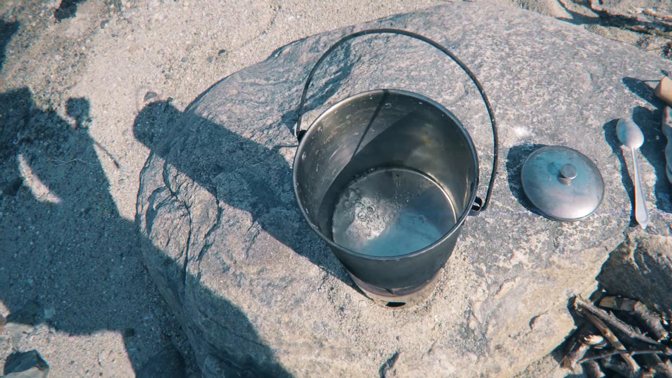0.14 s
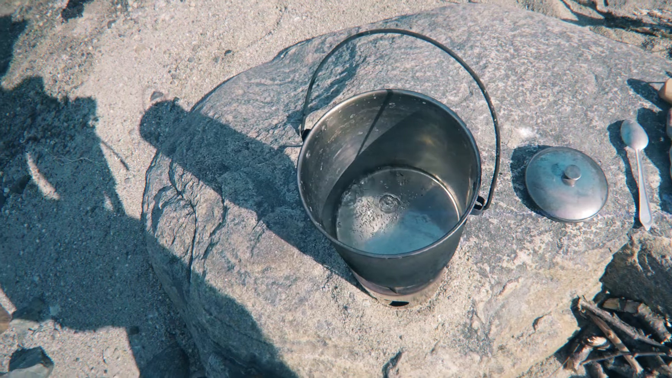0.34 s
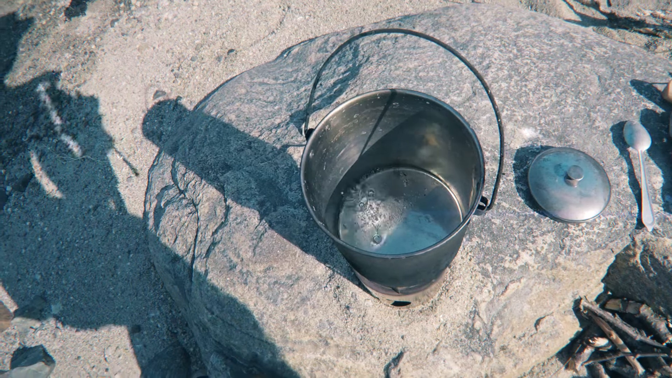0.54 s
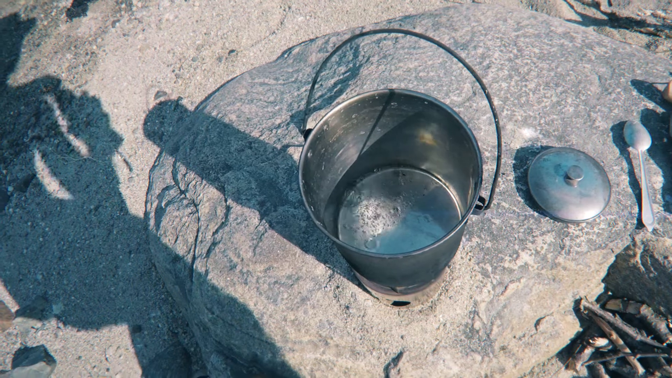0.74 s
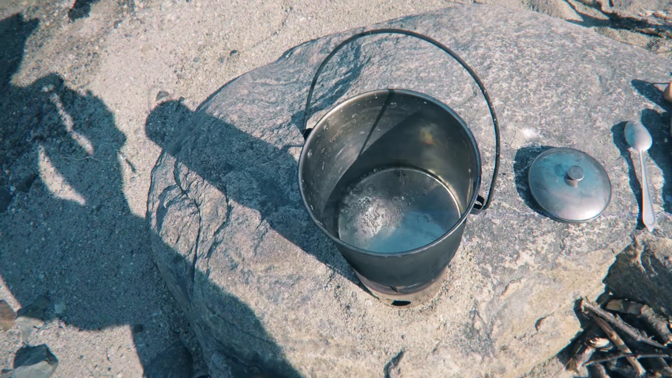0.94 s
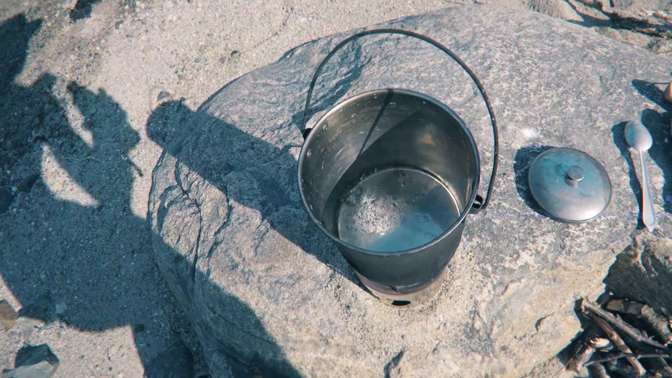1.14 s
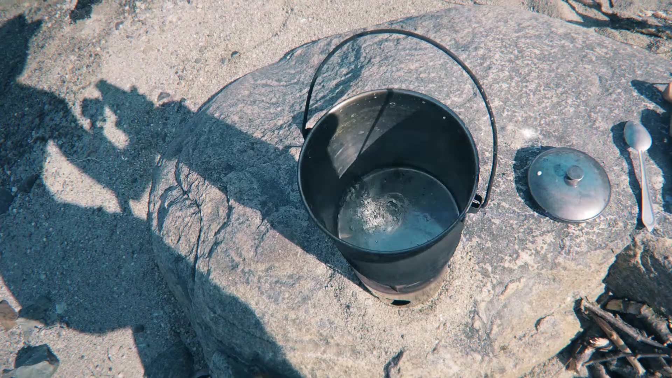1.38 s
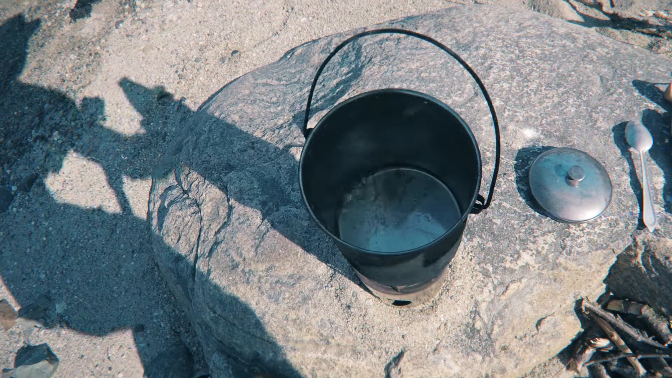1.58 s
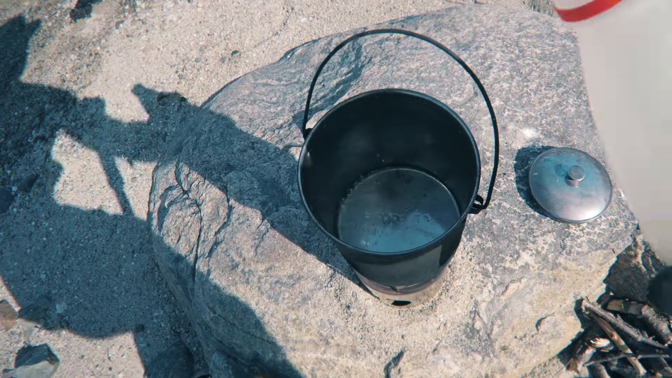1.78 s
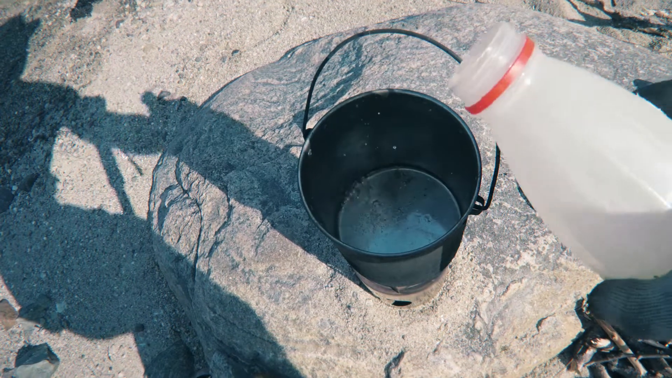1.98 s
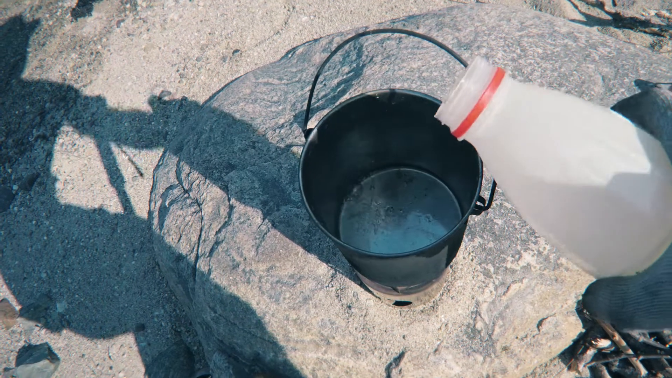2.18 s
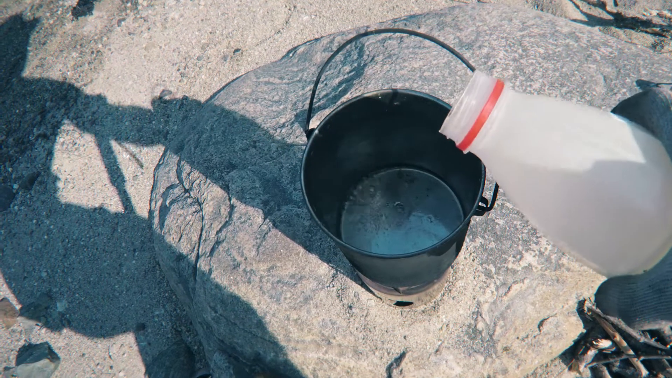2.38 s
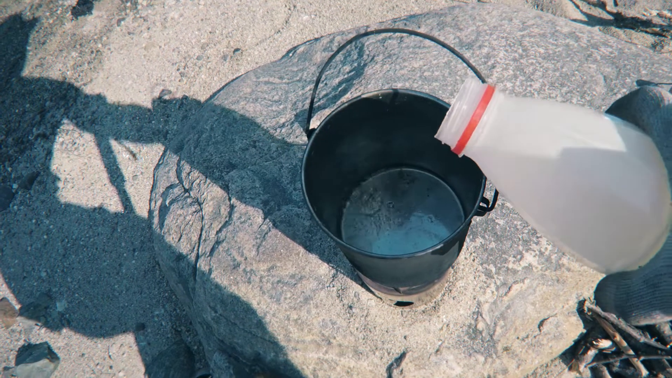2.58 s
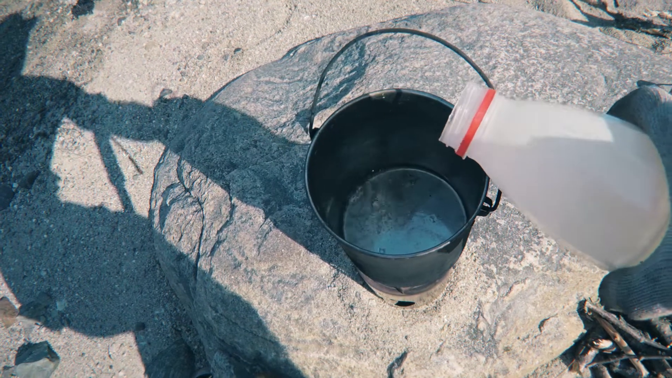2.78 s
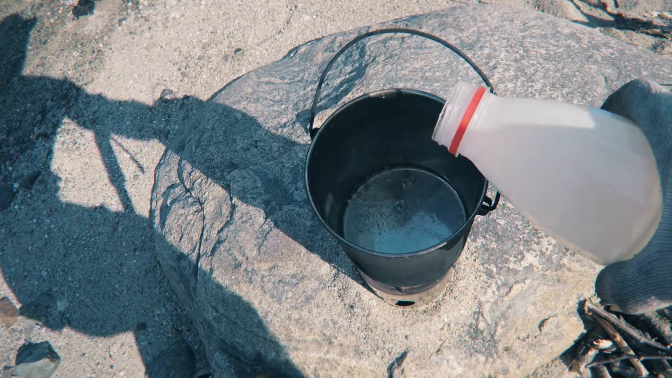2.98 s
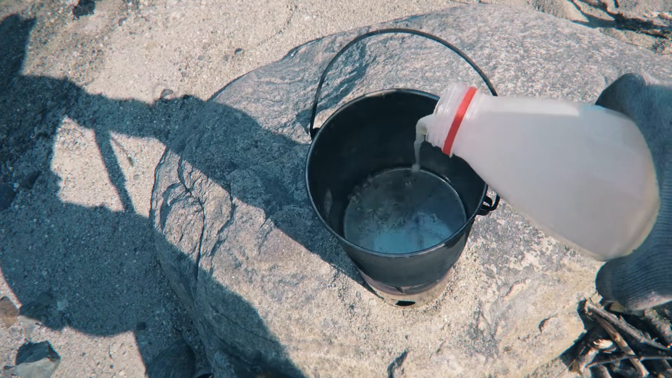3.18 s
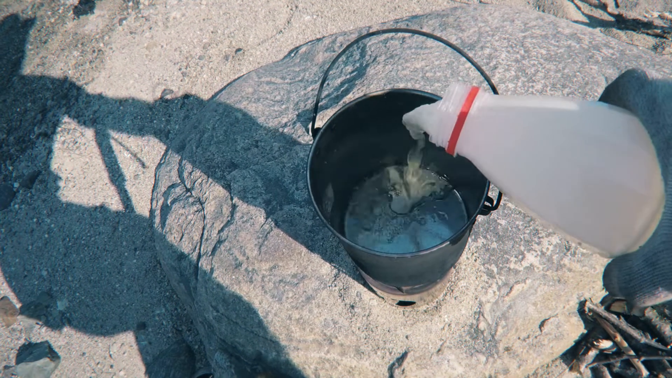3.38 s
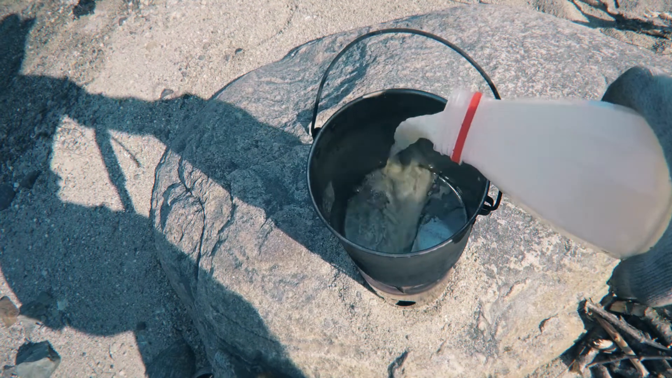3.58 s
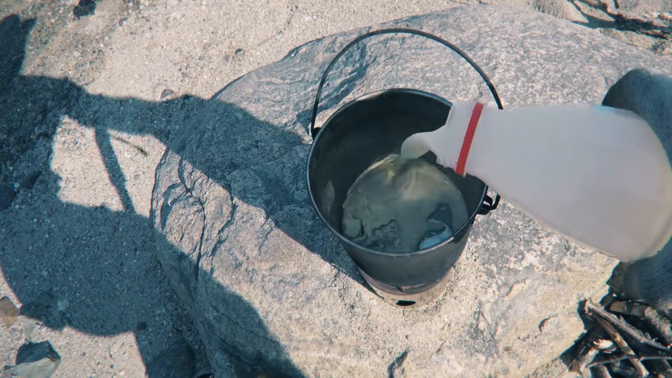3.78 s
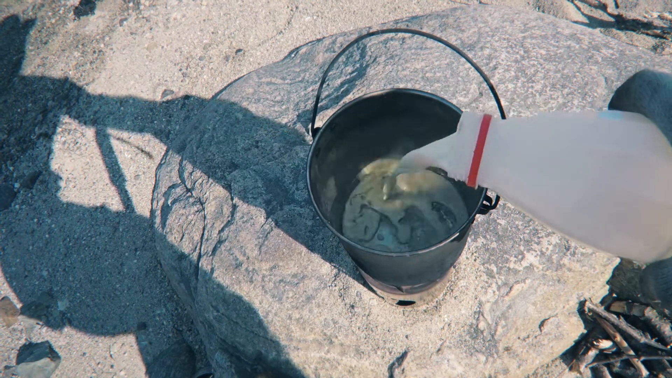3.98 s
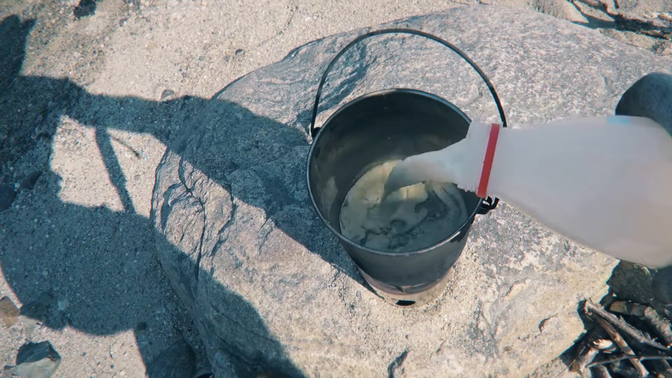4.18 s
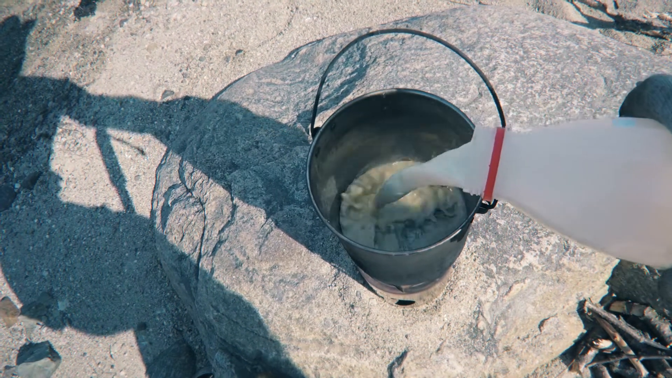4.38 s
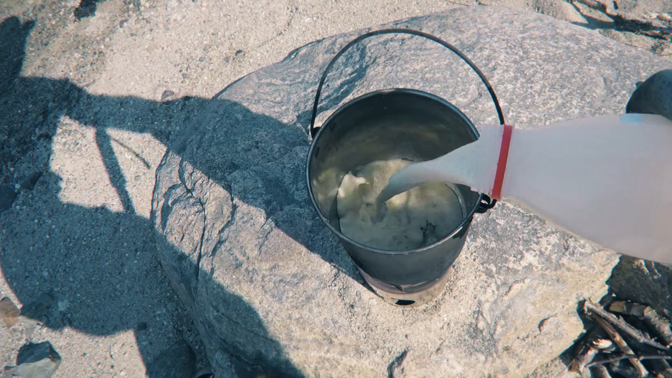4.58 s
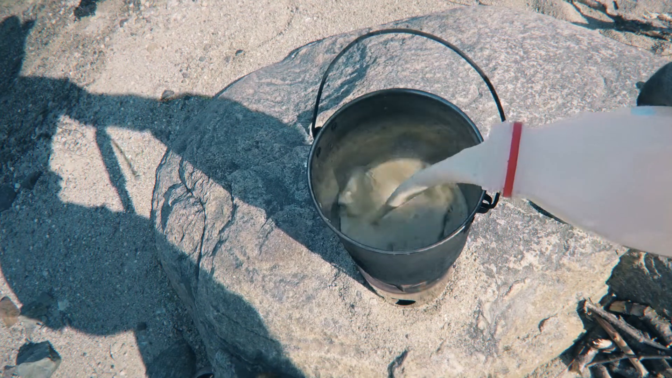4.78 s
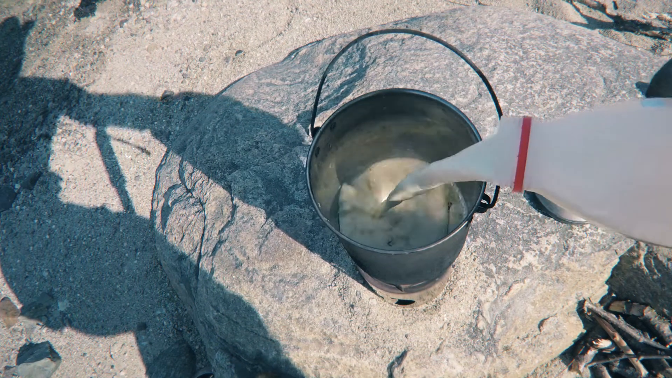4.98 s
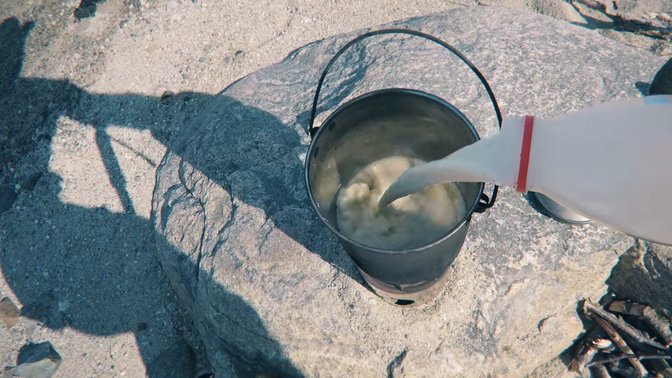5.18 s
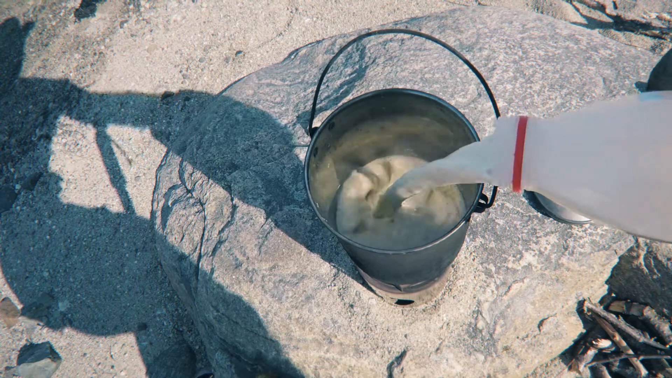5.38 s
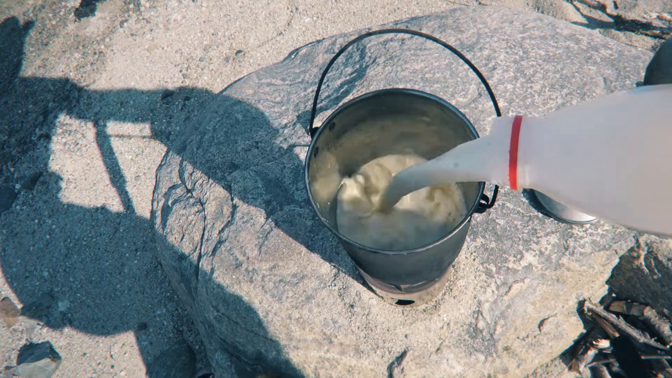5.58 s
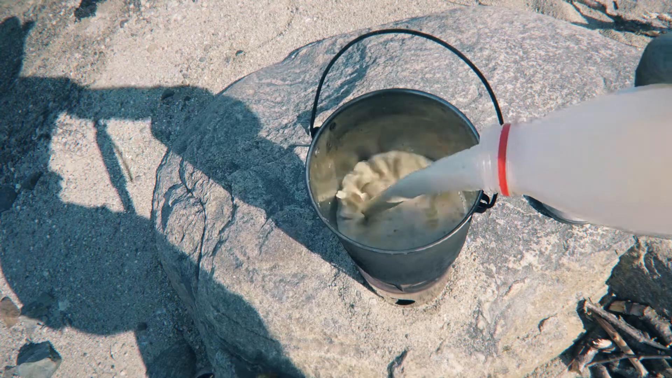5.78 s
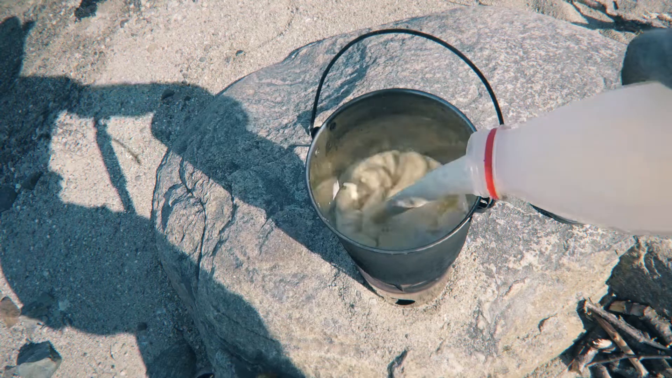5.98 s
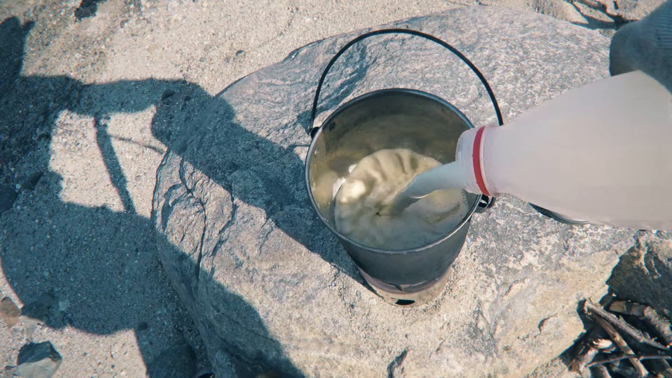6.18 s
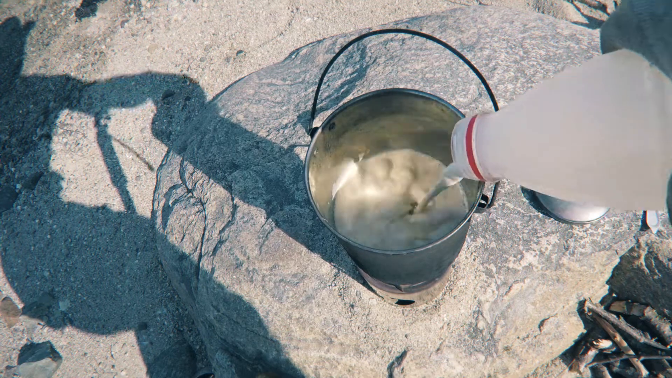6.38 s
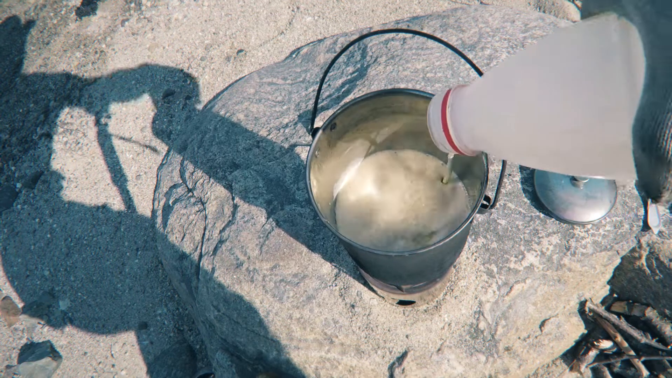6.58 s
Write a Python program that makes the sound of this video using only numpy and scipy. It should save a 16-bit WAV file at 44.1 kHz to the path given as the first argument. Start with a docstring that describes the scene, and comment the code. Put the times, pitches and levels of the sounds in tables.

```python
"""Liquid sloshes, plips and drips in a part-filled plastic bottle, lifted and tipped over a small metal pot
on a rock by the sea. The bubbles are gliding decaying sines; the bottle wall pops as a sum of damped modes.
Then a stream, random impacts through resonances, spatters on the bare pot bottom and goes quiet as the pool
deepens. Shaped noise gives the rubbing grip, the wind on the microphone and a faint wash of sea."""
import sys
import numpy as np
from scipy import signal
from scipy.fft import rfft, irfft, next_fast_len
from scipy.io import wavfile
from scipy.ndimage import uniform_filter1d

SR = 44100
rng = np.random.default_rng(int(sys.argv[2]) if len(sys.argv) > 2 else 0)


def unload_audio(sound):
    """Save the sound as a 16-bit wav file, at the path given as the first command line argument."""
    columns = np.transpose(np.atleast_2d(sound))
    # keep every value between -1 and 1, then stretch to whole-number steps
    steps = np.round(np.clip(columns, -1, 1) * 32767)
    wavfile.write(sys.argv[1], SR, steps.astype(np.int16))


N = 292559
TIME = np.arange(N) / SR

# Levels in the tables are relative, ahead of the trims in each function; colours are relative densities.
# Air pockets closing in the liquid. Each row: start in seconds, pitch in Hz, peak in dB.
POCKETS = [(0.0443, 4800, -51), (0.0808, 1576, -48), (0.0829, 3570, -51.5), (0.131, 3700, -47),
           (0.28, 3580, -51), (0.347, 3940, -52.5), (0.384, 3580, -38), (0.551, 2900, -47),
           (0.7808, 3400, -56.5), (0.984, 4700, -54.5), (1.027, 3320, -54), (1.126, 3500, -56),
           (1.136, 1800, -58), (1.201, 1120, -63), (1.283, 1540, -57.5), (1.4178, 3740, -41),
           (1.456, 3570, -52), (1.6127, 1835, -55.5), (1.7329, 3540, -51), (1.7828, 3720, -45.5),
           (1.992, 2320, -55), (2.096, 4940, -56), (2.1, 2870, -57.5), (2.11, 2380, -52.5),
           (2.135, 3580, -55.5), (2.235, 2450, -48.5), (2.244, 3060, -59), (2.2505, 3720, -52.5),
           (2.2844, 3550, -50.5), (2.389, 3500, -55.5), (2.401, 2950, -60.5), (2.4683, 5020, -62),
           (2.5137, 3070, -65.5), (2.5755, 3490, -58.5), (2.677, 5010, -52), (2.681, 1070, -54.5),
           (2.711, 1020, -60), (2.738, 3700, -52), (2.852, 3600, -57), (2.891, 5070, -46),
           (2.9144, 4900, -66), (2.9522, 3470, -60.5), (2.9954, 4480, -57), (3.051, 2360, -59),
           (3.0744, 5030, -62), (3.117, 3480, -55.5), (3.132, 1484, -49.5), (3.145, 1520, -52),
           (3.168, 2030, -54.5), (3.1882, 5030, -57.5), (3.333, 4940, -38.5), (3.3917, 5040, -56),
           (3.438, 3820, -54.5), (3.558, 1450, -59), (3.626, 3440, -52), (3.67, 3580, -37.5),
           (3.829, 1220, -58.5), (3.973, 2130, -52.5), (3.98, 1880, -48.5), (4.005, 3593, -46.5),
           (4.0024, 1750, -52), (4.051, 1270, -57.5), (4.182, 4780, -50), (4.2243, 4920, -59),
           (4.352, 5000, -59), (4.3881, 3900, -56.5), (4.4124, 4880, -57), (4.7712, 620, -51.5),
           (5.128, 637, -59), (5.7548, 3580, -64.5), (5.757, 4800, -68.5)]
# Hollow note of the vessel's air. Each row: time in seconds, pitch in Hz.
HOLLOW_NOTE = [(0, 513.7), (3.3, 512.4), (3.8, 483.6), (4.3, 436.3), (4.9, 427.7), (6.6, 430.6)]


def undb(db):
    """A level in decibels is 20 times the logarithm of this amplitude gain."""
    return 10 ** (np.asarray(db) / 20)


def unit(x):
    """Division by the root mean square gives unit effective amplitude."""
    return x / np.sqrt(np.mean(x ** 2))


def curve(rows, axis=1):
    """Linear interpolation in time carries one column of a table between its points."""
    rows = np.array(rows)
    return np.interp(TIME, rows[:, 0], rows[:, axis])


def add(track, s, sound):
    """Superposition: a sound starting at s seconds sums into the track."""
    start = max(int(s * SR), 0)
    track[start:start + len(sound)] += sound[:max(N - start, 0)]


def shape(x, colour):
    """Linear filtering multiplies the spectrum by a gain through (Hz, dB) points; rms 1."""
    hz, db = np.transpose(colour)
    size = next_fast_len(N, real=True)
    log_hz = np.log(np.fft.rfftfreq(size, 1 / SR) + 1)
    gain = undb(np.interp(log_hz, np.log(hz), db))
    return unit(irfft(rfft(x, size) * gain, size)[:N])


def noise(colour):
    """White Gaussian noise, equal in power at all frequencies, takes the colour of its filter."""
    return shape(rng.standard_normal(N), colour)


def band(x, lo_hz, hi_hz, order=2):
    """A Butterworth band-pass is maximally flat between its two corners."""
    sos = signal.butter(order, [lo_hz, min(hi_hz, .48 * SR)], "band", fs=SR, output="sos")
    return signal.sosfilt(sos, x)


def resonate(x, modes):
    """Resonances (Hz, width Hz, dB) driven in parallel sum with alternating polarity."""
    out = 0
    for k, (hz, width, db) in enumerate(modes):
        out = out + undb(db) * band(x, hz - width / 2, hz + width / 2, order=1) * (-1) ** k
    return out


def walk(rate):
    """Random steps, `rate` a second, averaged twice give a slow fluctuation with spread near 1."""
    k = int(SR / rate)
    steps = np.repeat(rng.standard_normal(N // k + 1), k)
    return 1.03 * uniform_filter1d(uniform_filter1d(steps, k), k)[:N]


def drops(rate, spread_db):
    """Independent impacts, `rate` a second: many small, a few large, of random sign."""
    when, size, sign = rng.random((int(rate * N / SR), 3)).T
    strength = undb(spread_db * np.minimum(-np.log(1 - size), 4))
    return np.bincount((when * N).astype(int), strength * np.sign(sign - .5), N)


def scatter(x, t60, wet_db):
    """Repeated reflection inside the vessel makes a short diffuse tail, 60 dB down after t60 seconds."""
    t = TIME[:SR // 4]
    tail = rng.standard_normal(len(t)) * undb(-60 * t / t60) * (t > .002)
    return undb(wet_db) * signal.fftconvolve(x, tail / np.linalg.norm(tail))[:N]


def pings(rate, spread_db, width=0.053, count=15):
    """Tiny bubbles as impulsively struck resonators of many pitches; `rate` is per pitch and second."""
    out = 0
    for hz in np.geomspace(1300, 7600, count):
        out = out + band(drops(rate, spread_db), hz * (1 - width / 2), hz * (1 + width / 2), order=1)
    return out


def fizz(rate, low_hz, high_hz, spread_db, cycles=9, tilt_db=0.5, widest_glide=0.05):
    """Small bubbles are damped oscillators, each with its own pitch, size, length and glide; rms 1."""
    out, t = np.zeros(N), TIME[:SR // 25]
    for when, pitch, size, length, bend in rng.random((int(rate * N / SR), 5)):
        hz = low_hz * (high_hz / low_hz) ** pitch
        age = t * hz / (cycles * (.5 + length))
        # the glide is a share of the pitch, up or down
        glide = widest_glide * (2 * bend - 1) * np.tanh(age / 2)
        phase = np.cumsum(hz * (1 + glide)) / SR
        # tilt_db is the gain for each octave of pitch
        db = spread_db * size ** 2 + tilt_db * np.log2(hz / low_hz)
        add(out, when * N / SR, undb(db) * np.sqrt(age) * np.exp(-age) * np.sin(2 * np.pi * phase))
    return unit(out)


def covered(covered_s=4.37, closing_s=0.16):
    """Liquid damps the metal it covers: covered share, 0-1, half at covered_s."""
    return np.clip((TIME - covered_s) / closing_s + .5, 0, 1)


def spurts(rate=60, fade_s=0.007, spread_db=3.5):
    """A stream lands in gobs, each a sudden burst with exponential decay; gain with rms 1."""
    gobs = np.abs(drops(rate, spread_db))
    return unit(signal.lfilter([1], [1, -np.exp(-1 / (fade_s * SR))], gobs) + 0.26)


def sea():
    """Distant water sums countless incoherent sources into a smooth wash that slowly swells."""
    # Each row: frequency in Hz, density in dB per Hz.
    sea_colour = [(300, -9), (750, -6.5), (1100, -12.5), (2000, -6.5), (4000, -12), (7000, -5.5),
                  (10000, -9), (12000, -9), (14500, -5), (15800, -18)]
    return noise(sea_colour) * undb(-84.5 + 0.58 * walk(1.8))


def gusting(breeze_db, axis, attack_s=0.019, release_s=0.0079):
    """Incoherent powers add: gusts rise, hold and decay over the breeze; amplitude gain."""
    # Gusts. Each row: start and length in seconds, rumble and flutter levels in dB.
    gust_rows = [(0.325, 0.12, -32.5, -58), (0.783, 0.042, -25.5, -60), (0.982, 0.028, -30.5, -49.5),
                 (1.162, 0.02, -23, -44.5), (1.202, 0.1, -31.5, -47.5), (2.197, 0.092, -29, -48),
                 (2.291, 0.18, -42.5, -50.5), (2.995, 0.059, -31, -49.5), (3.291, 0.21, -29.5, -50.5),
                 (3.548, 0.057, -28.5, -61), (3.689, 0.19, -28, -55), (3.966, 0.27, -26.5, -55.5),
                 (4.579, 0.11, -38, -72), (4.85, 0.055, -32, -61.5), (4.911, 0.037, -29, -58),
                 (5.171, 0.074, -25.5, -50), (5.259, 0.1116, -28, -57), (5.449, 0.03, -31.5, -58),
                 (5.483, 0.032, -22.5, -51.5), (5.561, 0.049, -26.5, -57), (5.69, 0.097, -26, -56.5),
                 (5.953, 0.084, -28, -54.5), (6.064, 0.049, -28.5, -58), (6.316, 0.096, -33.5, -62),
                 (6.582, 0.024, -19.5, -50)]
    power = undb(breeze_db) ** 2
    for s, length, *levels in gust_rows:
        rise = np.clip((TIME - s) / attack_s + .5, 0, 1)
        fall = np.exp(-np.maximum(TIME - s - length, 0) / release_s)
        power = power + (undb(levels[axis]) * rise * fall) ** 2
    return np.sqrt(power)


def wind(evenness=1.0, flutter_db=-59, flutter_law=0.66):
    """Turbulent pressure rumbles on the microphone; stronger eddies flutter higher up."""
    # Breeze between gusts. Each row: time in seconds, rumble level in dB.
    breeze_rows = [(0, -41), (1.35, -36.5), (2.05, -47), (2.45, -41.5), (2.57, -39), (2.68, -56.5),
                   (2.86, -59.5), (2.96, -45), (3.1, -36.5), (4.3, -35.5), (4.65, -36.5), (4.76, -46),
                   (5.0, -34), (5.08, -47.5), (5.2, -40), (5.6, -35.5), (6.15, -37), (6.63, -35.5)]
    # Spectrum of the rumble. Each row: frequency in Hz, density in dB per Hz.
    rumble_colour = [(8.8, -18.5), (15, 1.5), (31, 1), (44, -2), (89, -18), (155, -33), (216, -64.5),
                     (339, -41), (400, -37), (520, -74), (880, -120)]
    # Spectrum of the flutter. Each row: frequency in Hz, density in dB per Hz.
    flutter_colour = [(50, -33.5), (100, -5), (160, -7), (215, -16.5), (300, -21), (420, -20.5),
                      (600, -36.5), (850, -42), (2000, -55), (8000, -69)]
    breeze_db = curve(breeze_rows)
    rumble = unit(band(noise(rumble_colour), 11.25, 120, order=3))
    # dividing by the local rms evens out the rumble
    rumble = rumble / uniform_filter1d(rumble ** 2, SR // 12) ** (evenness / 2)
    # flutter_law: dB of flutter for each dB of breeze above -40 dB
    flutter_gain = gusting(flutter_db + flutter_law * (breeze_db + 40), axis=1)
    flutter = noise(flutter_colour) * flutter_gain
    return rumble * gusting(breeze_db, axis=0) + flutter * undb(2.56 * walk(28) - 2.5)


def thin_hiss():
    """Narrow-band noise fluctuates: two bands of hiss flicker and fade in the first second."""
    low_db = np.interp(TIME, [.2, .8, .92], [-73, -77, -100])
    high_db = np.interp(TIME, [0, .35, .8], [-74, -86, -105])
    low = unit(band(rng.standard_normal(N), 2190, 2400)) * undb(low_db)
    high = unit(band(rng.standard_normal(N), 6200, 6600)) * undb(high_db)
    return (low + high) * undb(3 * walk(37))


def rub():
    """Stick-slip friction: the grip creeps over the plastic in many small slips."""
    # The rubbing hand. Each row: time in seconds, level in dB.
    rub_rows = [(0, -45.5), (.07, -78), (.14, -48.5), (.33, -58.5), (.42, -51), (.55, -62), (.9, -66),
                (1.08, -60), (1.15, -72), (1.4, -74), (2.9, -71.5), (3.4, -100)]
    # Spectrum of the rubbing. Each row: frequency in Hz, density in dB per Hz.
    rub_colour = [(150, 5), (330, 12.5), (520, 4), (780, 2), (1100, -9.5), (1900, -16), (2350, -23),
                  (2900, -38), (3600, -19.5), (5500, -45.5), (15000, -50)]
    slips = drops(rate=640, spread_db=2.0)
    slips = slips + scatter(slips, t60=0.01, wet_db=1)
    return shape(slips, rub_colour) * undb(curve(rub_rows) + 3.35 * walk(44.97))


def pops(crack_db=-13, crack_s=0.01):
    """Modal superposition: the snapping wall rings in damped modes, with a short ragged crackle."""
    # Pops of the wall. Each row: start in seconds, peak in dB, level of the upper modes in dB.
    pop_rows = [(0.082, -40, -33), (0.136, -26, -21), (0.217, -21.5, -22.5), (0.274, -41, -29),
                (0.3, -49, -26), (0.4, -37, -21.5), (0.429, -40.5, -28), (0.795, -37, -22),
                (0.943, -38.5, -23.5), (1.0427, -27, -24.5), (1.782, -36, -30), (1.801, -38.5, -23.5),
                (2.821, -44, -33)]
    # Modes of the bottle wall. Each row: frequency in Hz, level in dB, 60 dB decay time in seconds.
    wall_modes = [(328.7, 7, 0.063), (526, 6, 0.021), (587, 4, 0.026), (790, -19.5, 0.089),
                  (888, -7.5, 0.025), (1256, 8, 0.018), (1349, 6, 0.03), (1720, -1, 0.0098),
                  (2340, -1.5, 0.029)]
    # Spectrum of the wall's crackle. Each row: frequency in Hz, density in dB per Hz.
    crack_colour = [(150, -40), (300, 3), (850, 4.5), (1050, -16), (1300, -4.5), (1750, -8), (2400, -16),
                    (3500, -19), (9000, -55)]
    out, crack, t = np.zeros(N), np.zeros(N), TIME[:SR // 6]
    for s, db, upper_db in pop_rows:
        ring = np.zeros(len(t))
        for k, (hz, mode_db, t60) in enumerate(wall_modes):
            # a sharper snap wakes more of the upper modes
            decay = undb(mode_db + (hz > 1100) * (upper_db + 14.5) - 60 * t / t60)
            detuned_hz = hz * (1 + 0.031 * rng.standard_normal())
            ring += decay * np.sin(2 * np.pi * detuned_hz * t) * (-1) ** k
        add(out, s, undb(db - 2.5) * ring / np.abs(ring).max())
        add(crack, s, undb(db + crack_db) * np.exp(-t / crack_s))
    out = band(out, 185, 5100, order=4) + undb(-5.5) * crack * noise(crack_colour)
    return out + scatter(out, t60=0.16, wet_db=-10.5)


def sheets(swell_s=0.0062):
    """Breakup of a liquid sheet on a wall gives a crackling hiss: noise under a short envelope."""
    # Spreading sheets. Each row: start in seconds, level in dB, decay time constant in seconds.
    sheet_rows = [(1.424, -64.5, 0.014), (1.6, -78, 0.043), (3.292, -52, 0.039), (3.646, -63.5, 0.02),
                  (3.998, -74, 0.049)]
    # Spectrum of a breaking sheet. Each row: frequency in Hz, density in dB per Hz.
    sheet_colour = [(1500, -30), (2900, -24), (3400, -2), (4300, -9.5), (5030, 7.5), (5400, -15),
                    (7100, -3), (8400, -9.5), (9700, -31), (11000, -6), (13000, -8), (15500, -8)]
    envelope, t = np.zeros(N), TIME[:SR // 4]
    for s, db, decay_s in sheet_rows:
        add(envelope, s, undb(db) * np.minimum(t / swell_s, 1) * np.exp(-t / decay_s))
    return envelope * noise(sheet_colour) * undb(6.0 + 4.9 * walk(400))


def ticks(burst_s=0.00092):
    """Impact excitation: a droplet slaps a wall as a millisecond burst of noise peaked at high resonances."""
    # Droplet slaps. Each row: start in seconds, peak in dB, top sizzle in dB relative to that peak.
    tick_rows = [(0.1314, -41.5, -4), (0.2045, -28, -13), (0.267, -39, 4), (0.439, -38.5, 0.5),
                 (0.538, -41, -8), (0.633, -40, -1), (0.6583, -38, 5.5), (0.705, -38.5, -2),
                 (1.1043, -36, -3), (1.615, -25, -12), (1.6363, -38.5, -7), (1.649, -35.5, -4),
                 (1.8529, -37, -20), (1.8905, -41.5, 11.5), (2.1818, -39.5, -18), (2.258, -40.5, -27),
                 (2.359, -47.5, -1), (2.398, -48.5, 1), (2.7366, -34.5, 0.5), (2.8937, -43.5, 4.5),
                 (3.3336, -23, -30), (3.46, -39.5, -18), (3.633, -43, 14), (4.0051, -39, -21)]
    # Spectrum of a droplet's ring. Each row: frequency in Hz, density in dB per Hz.
    ring_colour = [(2500, -46), (3700, -4.5), (4300, -19), (5050, -10), (5800, -26), (6500, -3), (7100, 7),
                   (7900, -10.5), (9200, -24.5), (16000, -38)]
    # Spectrum of its sizzle. Each row: frequency in Hz, density in dB per Hz.
    top_colour = [(9000, -63), (10000, -12), (11000, -13.5), (13000, 10.5), (15500, -1.5)]
    body, top, t = np.zeros(N), np.zeros(N), TIME[:SR // 30]
    burst = t / burst_s * np.exp(1 - t / burst_s)
    for s, db, sizzle_db in tick_rows:
        add(body, s, undb(db) * burst)
        add(top, s, undb(db + sizzle_db) * burst)
    out = undb(-13.0) * body * noise(ring_colour) + undb(-17.5) * top * noise(top_colour)
    return out + scatter(out, t60=0.071, wet_db=-7.0)


def slosh(spatter_db=-27, spatter_s=0.011, click_db=-2):
    """Many small bubble oscillations sum to a crackle; each pocket above 1 kHz also throws a short shower."""
    # Fine crackle of the sloshing. Each row: time in seconds, level in dB.
    slosh_rows = [(0, -74), (.2, -68.5), (.45, -74.5), (.9, -71), (1.3, -71), (1.7, -72), (2.05, -74.5),
                  (2.35, -76), (2.75, -73.5), (3.05, -83.5), (3.3, -72), (3.6, -100)]
    # Spectrum of the crackle, coloured by the walls. Each row: frequency in Hz, density in dB per Hz.
    crackle_colour = [(700, -23.5), (1350, -3), (1650, -7), (1900, -3), (2100, -9.5), (2380, -5),
                      (2700, -13), (3200, -7.5), (3520, 4), (3900, -7.5), (4250, -17.5), (4700, -3),
                      (5050, 1.5), (5500, -23.5), (6300, -10.5), (7000, 3), (7600, -8.5), (8400, -18),
                      (9700, -25.5), (13000, -16.5), (15500, -19.5)]
    envelope, t = np.zeros(N), TIME[:SR // 6]
    for s, hz, db in POCKETS:
        add(envelope, s, undb(db + spatter_db) * np.exp(-t / spatter_s) * (hz > 1000))
    crackle = shape(fizz(rate=420, low_hz=2200, high_hz=7410, spread_db=23), crackle_colour)
    crackle = crackle + undb(click_db) * shape(drops(rate=70, spread_db=4.0), crackle_colour)
    shower = envelope * shape(pings(rate=140, spread_db=3.5), crackle_colour)
    out = crackle * undb(curve(slosh_rows) + 2 * walk(18)) + shower
    return undb(-4.5) * out + scatter(out, t60=0.068, wet_db=-8.5)


def slaps(swell_s=0.0046, width=0.17):
    """Impact of a gush on the liquid: a ragged band of random grains swells, then trails away as a power law."""
    # Gushes. Each row: start in seconds, level in dB, centre in Hz.
    slap_rows = [(0.082, -67, 1700), (0.12, -49, 1920), (0.168, -55, 1700), (0.269, -64, 1300),
                 (1.848, -70, 3700), (1.89, -62.5, 3860), (2.239, -73, 1910), (2.603, -64, 2900),
                 (3.137, -59, 1600), (3.186, -62, 1900), (3.452, -64.5, 2200), (3.5, -64, 1750),
                 (3.522, -66, 3230), (3.71, -71, 3100), (3.667, -41.5, 3820), (3.657, -52.5, 2300),
                 (3.677, -49, 2430), (3.742, -62, 2100), (3.98, -51, 1760), (4.053, -56.5, 3500),
                 (4.127, -64, 1700), (4.162, -65, 2200), (4.227, -68, 2300)]
    out, t = np.zeros(N), TIME[:SR // 8]
    envelope = t / swell_s / (1 + 0.7 * (t / swell_s) ** 3.14)
    for s, db, hz in slap_rows:
        grains = rng.standard_normal(len(t)) * rng.standard_exponential(len(t))
        burst = unit(band(grains, hz * (1 - width), hz * (1 + width), order=3))
        add(out, s, undb(db) * envelope * burst)
    return out


def bubbles(glide=0.045, roughness=0.28, gulp_hz=700, swell_s=0.0029, swell_law=0.31):
    """Volume oscillation: a pocket swells, rings and rises in pitch; large ones last longer and shake the wall."""
    # Big pockets that gulp at the hollow note. Each row: start in seconds, peak in dB.
    gulp_rows = [(1.2032, -48), (1.961, -46.5), (2.2368, -42), (2.5657, -35), (2.6772, -37), (2.705, -50.5),
                 (2.7365, -48.5), (2.7871, -46.5), (2.8543, -50.5), (3.132, -51.5), (3.1844, -49.5),
                 (3.69, -49), (3.755, -48), (3.8328, -41.5)]
    out, shake, t = np.zeros(N), np.zeros(N), TIME[:SR // 20]
    gulps = [(s, np.interp(s, *np.transpose(HOLLOW_NOTE)), db) for s, db in gulp_rows]
    for s, hz, db in list(POCKETS) + gulps:
        # swell_s holds at 1 kHz and shortens with pitch
        age = t / (swell_s * (hz / 1000) ** -swell_law)
        envelope = undb(db) * age * np.exp(1 - age)
        cycles = np.cumsum(hz * (1 + glide * np.tanh((age - 1.5) / 4))) / SR
        # froth around the pocket disturbs its ring every few cycles
        chance = rng.standard_normal((128, 2))
        froth = np.interp(cycles / 3, np.arange(len(chance)), chance[:, 0] + 1j * chance[:, 1])
        add(out, s, envelope * np.imag((1 + roughness * froth) * np.exp(2j * np.pi * cycles)))
        add(shake, s, envelope * (hz < gulp_hz))
    wall = unit(resonate(rng.standard_normal(N), [(314, 17.5, 11.5), (1127, 27, -11.5)]))
    # the wall answers 5 ms later
    late_shake = uniform_filter1d(np.roll(shake, SR // 200), SR // 80)
    wall = band(wall, 190, 1500, order=3) * late_shake
    return undb(-1.5) * out + scatter(out, t60=0.083, wet_db=-7.5) + undb(-9.5) * wall


def hollow(width_hz=100, still_width_hz=40, still_db=-73.5):
    """Cavity resonance: drumming liquid excites a note that sinks under the load and hums over the deep pool."""
    # Drumming of moving liquid on the vessel. Each row: time in seconds, level in dB.
    drum_rows = [(0.0, -66), (0.42, -56), (0.7, -77), (1.25, -60), (2.1, -97), (2.66, -57), (2.94, -78),
                 (3.15, -64.5), (3.75, -54), (4.65, -77), (6.55, -83)]
    carrier = np.exp(2j * np.pi * np.cumsum(curve(HOLLOW_NOTE)) / SR)

    def note(width):
        """Amplitude modulation by low-passed impacts broadens the carrier into a resonance; rms 1."""
        beats = drops(rate=290, spread_db=3.5) + 1j * drops(rate=260, spread_db=4.0)
        lowpass = signal.butter(3, width / 2, fs=SR, output="sos")
        return unit(np.real(carrier * signal.sosfilt(lowpass, beats)))

    drummed = note(width_hz) * undb(curve(drum_rows) - 5.5 + 3.3 * walk(25.1))
    return drummed + note(still_width_hz) * undb(still_db) * covered()


def pool(deep_db=-82.5, deep_bubbles_db=-86):
    """Entrained air makes the noise: broad churning, fine sizzle, then a soft deep-pool wash and froth."""
    # High resonances of the walls. Each row: frequency in Hz, width in Hz, level in dB.
    sizzle_modes = [(11030, 330, -5.5), (12900, 760, -1), (14700, 2500, -4.5)]
    # The finest sizzle. Each row: time in seconds, level in dB.
    sizzle_rows = [(0, -83), (.35, -74.5), (.6, -85.5), (1.4, -82), (2.1, -86.5), (3.1, -84.5), (3.35, -75),
                   (3.8, -81.5), (3.99, -69), (4.12, -83), (4.6, -88.5), (6.6, -100)]
    # Froth once the metal is covered. Each row: time in seconds, level in dB.
    froth_rows = [(4.3, -100), (5.25, -93), (5.45, -81.5), (5.85, -85), (5.97, -72), (6.08, -93),
                  (6.22, -80), (6.63, -86)]
    # Broad churning. Each row: time in seconds, level in dB.
    churn_rows = [(0, -83.5), (2.9, -85), (3.4, -87), (3.9, -78.5), (4.2, -76), (4.6, -87.5), (5.3, -91),
                  (6.6, -100)]
    # Spectrum of churning and deep wash. Each row: frequency in Hz, density in dB per Hz.
    pool_colour = [(400, -21), (700, 6.5), (1000, -1), (2400, -1), (2900, -5), (3600, -3.5), (4300, -4.5),
                   (5000, -5.5), (6000, -4), (10000, -36.5)]
    sizzle = resonate(drops(rate=3600, spread_db=6), sizzle_modes)
    sizzle = unit(band(sizzle, 10500, 20000, order=3)) * undb(curve(sizzle_rows) + 2.3 * walk(20))
    froth = unit(band(drops(rate=5200, spread_db=5.5), 13200, 15400, order=3))
    froth = froth * undb(curve(froth_rows) + walk(28))
    wash = shape(drops(rate=7300, spread_db=5.5), pool_colour)
    dragged_bubbles = fizz(rate=150, low_hz=899, high_hz=6000, spread_db=10)
    deep = undb(deep_db) * wash + undb(deep_bubbles_db) * dragged_bubbles
    churn = wash * undb(curve(churn_rows) - 1.5) * spurts(rate=70, fade_s=0.008, spread_db=3.0)
    return churn + sizzle + covered() * deep + froth


def stream(gurgle_db=-1, splash_db=-12):
    """Forced resonance: gobs ring the metal and trap small bubbles; the ringing dies as the pool deepens."""
    # Four groups of resonances. Each row: frequency in Hz, width in Hz, level in dB.
    low_modes = [(1393, 220, -3.5), (1840, 490, -3), (2350, 110, 2)]
    mid_modes = [(3370, 170, -0.35), (3564, 200, 1.5)]
    high_modes = [(4780, 190, -3), (5020, 100, 0)]
    top_modes = [(6970, 170, 0), (7140, 270, -9)]
    # Their levels as the stream lands. Each row: time in seconds, low, mid, high and top levels in dB.
    ring_rows = [(2.85, -125, -125, -125, -125), (3.0, -93, -89, -85, -106), (3.11, -77.5, -77, -70, -76.5),
                 (3.2, -71.5, -85, -78, -74), (3.28, -78, -80, -77, -81), (3.32, -79, -57.5, -63, -65),
                 (3.4, -80, -84, -68, -66.5), (3.5, -67.5, -70, -71.5, -64.5),
                 (3.61, -77.5, -80, -68, -67.5), (3.68, -74, -69, -61.5, -61.5),
                 (3.76, -78, -72.5, -61.5, -65.5), (3.85, -76, -82, -80, -70), (3.94, -79, -93, -71, -64),
                 (4.01, -67, -65.5, -62, -79), (4.1, -86, -76, -74, -83), (4.16, -73.5, -76, -62, -80),
                 (4.25, -77, -66.5, -67, -77), (4.34, -81, -86, -71, -85), (4.41, -91, -76, -63.5, -89),
                 (4.48, -87, -76.5, -87, -78), (4.8, -100, -87.5, -100, -100)]
    out, gobs = np.zeros(N), spurts()
    for k, modes in enumerate([low_modes, mid_modes, high_modes, top_modes]):
        ring = np.zeros(N)
        for mode in modes:
            # each resonance shares the common gobs and has spurts of its own
            impacts = drops(rate=150, spread_db=3.0) * (gobs + spurts())
            ring += resonate(impacts, [mode])
        ring = band(ring, 0.88 * modes[0][0], 1.07 * modes[-1][0])
        ring = unit(ring + scatter(ring, t60=0.06, wet_db=-5.5))
        out += ring * undb(curve(ring_rows, axis=k + 1) - 2.0)
    gurgle_level = np.maximum(curve(ring_rows, axis=1), curve(ring_rows, axis=2) - 3) + gurgle_db
    gurgle = fizz(rate=200, low_hz=1155, high_hz=3996, spread_db=13.5, cycles=7) * undb(gurgle_level)
    splash = fizz(rate=900, low_hz=2860, high_hz=7450, spread_db=10, cycles=6.5)
    splash = splash * undb(curve(ring_rows, axis=3) + splash_db)
    return out + (gurgle + splash) * gobs


def scene():
    """Superposition of bottle, liquid and shore, heard from just above the pot."""
    # Ringing of the vessel's thin wall. Each row: frequency in Hz, width in Hz, level in dB.
    vessel_modes = [(1787, 38, 0.5), (3640, 120, -7), (5240, 76, -3.5), (7200, 110, -16)]
    shore = sea() + wind()
    bottle = thin_hiss() + rub() + pops()
    impacts = ticks() + slaps() + bubbles()
    # the thin wall sings on 5 ms after each impact
    wall = undb(-2) * resonate(np.roll(impacts, SR // 200), vessel_modes)
    liquid = impacts + wall + sheets() + slosh() + hollow() + pool() + stream()
    return (shore + bottle + liquid)[None]


def record(dry, top_hz=15700, ease_s=.006):
    """An elliptic low-pass cuts steeply above top_hz; linear ramps ease the sound in and out."""
    ends = np.minimum(np.minimum(TIME, TIME[-1] - TIME) / ease_s, 1)
    return signal.sosfilt(signal.ellip(8, .2, 70, top_hz, fs=SR, output="sos"), dry * ends)


dry = scene()
out = record(dry)
unload_audio(out)
```